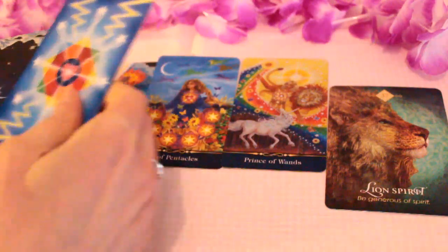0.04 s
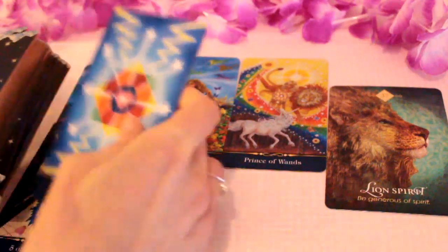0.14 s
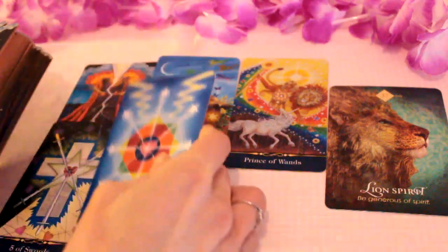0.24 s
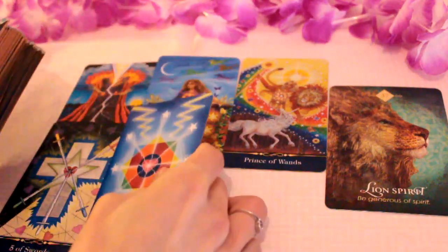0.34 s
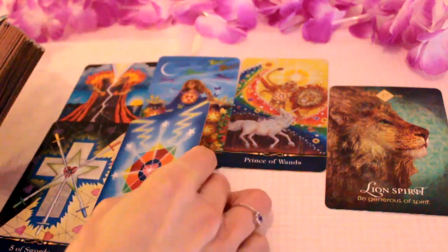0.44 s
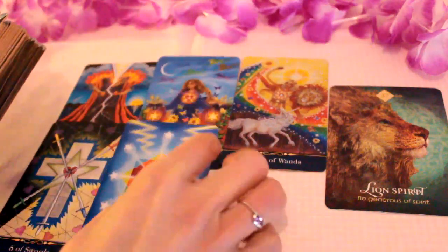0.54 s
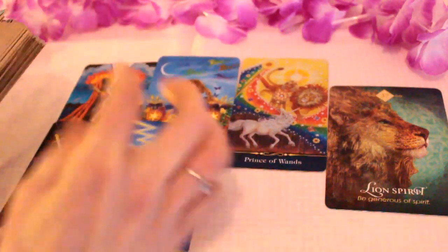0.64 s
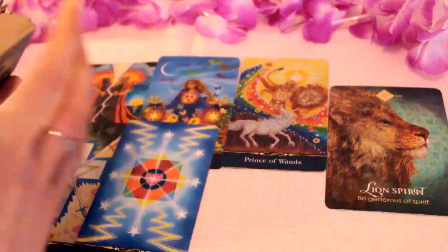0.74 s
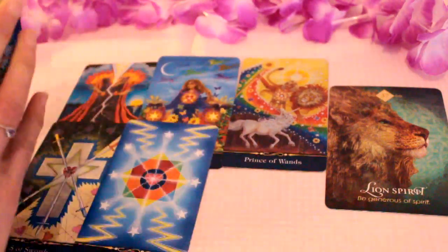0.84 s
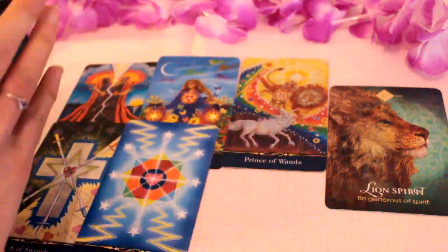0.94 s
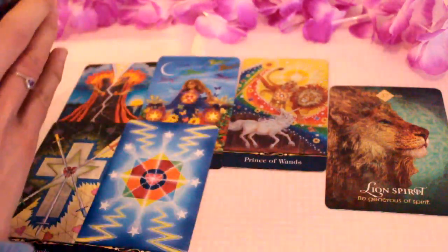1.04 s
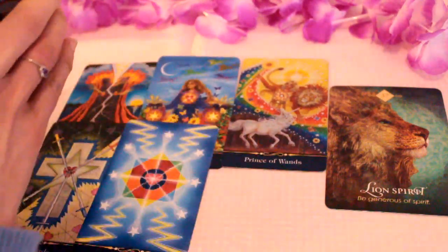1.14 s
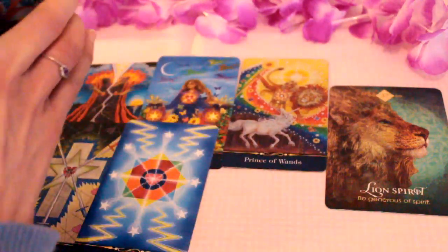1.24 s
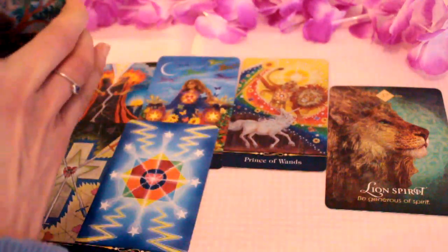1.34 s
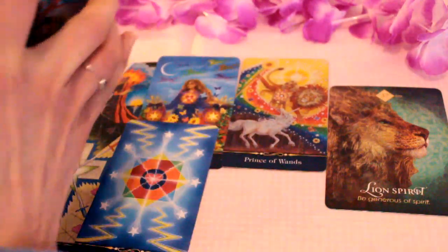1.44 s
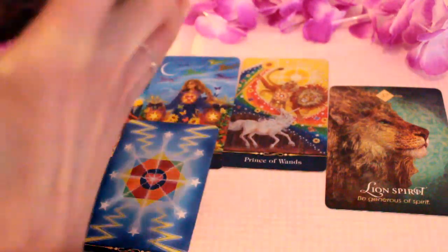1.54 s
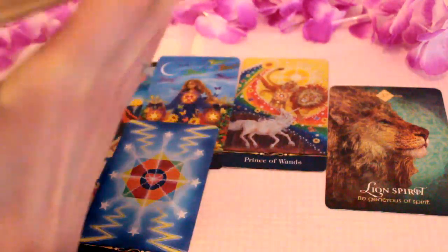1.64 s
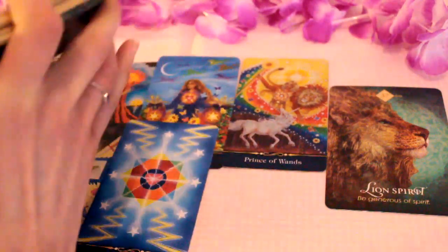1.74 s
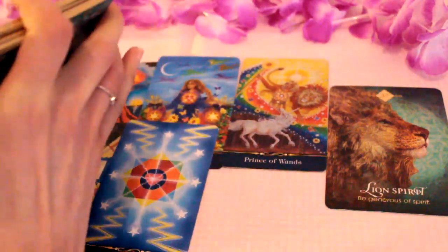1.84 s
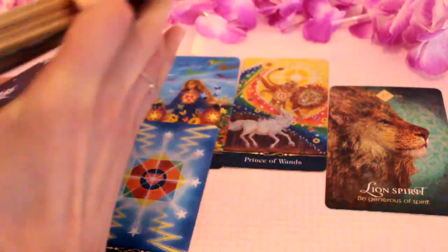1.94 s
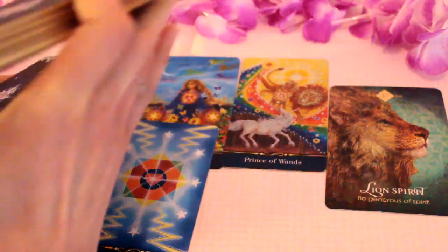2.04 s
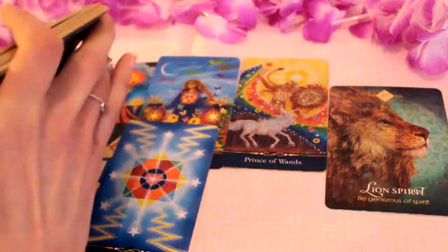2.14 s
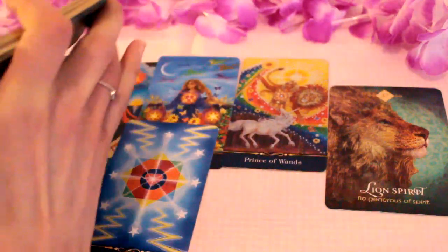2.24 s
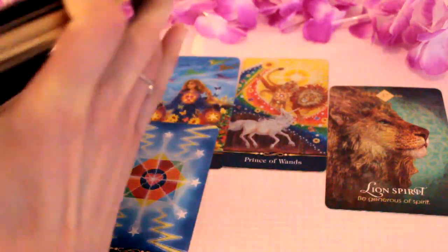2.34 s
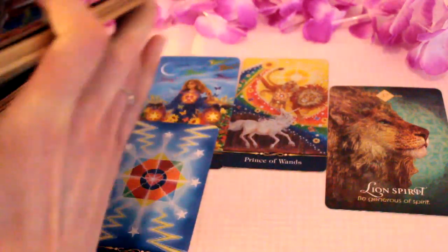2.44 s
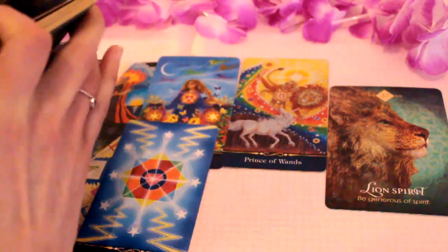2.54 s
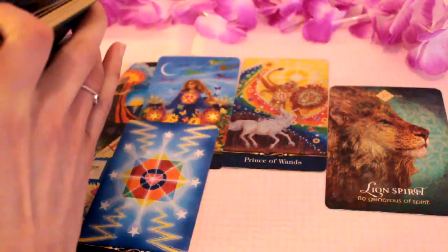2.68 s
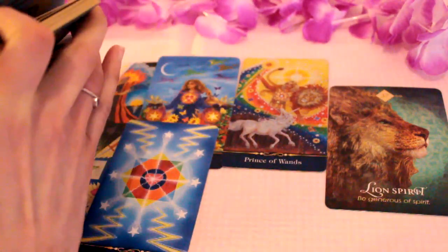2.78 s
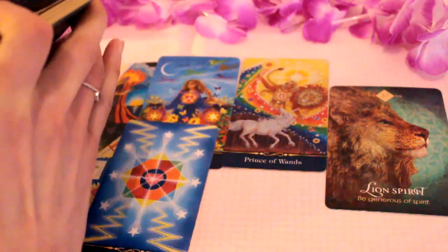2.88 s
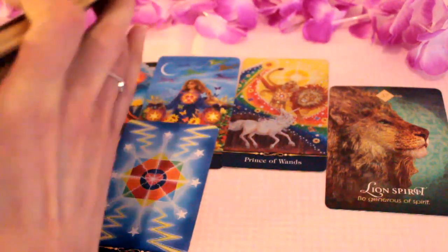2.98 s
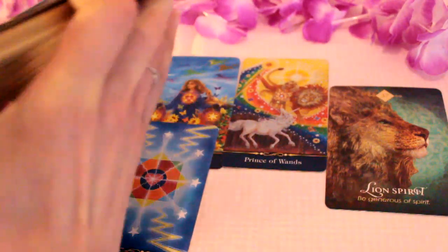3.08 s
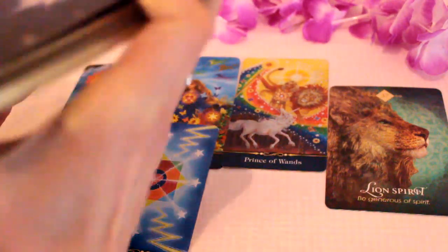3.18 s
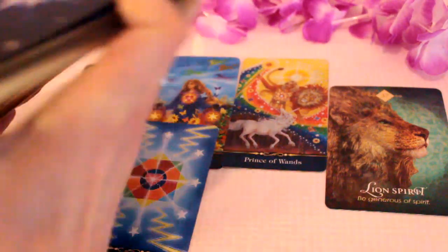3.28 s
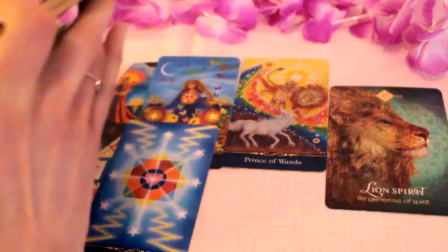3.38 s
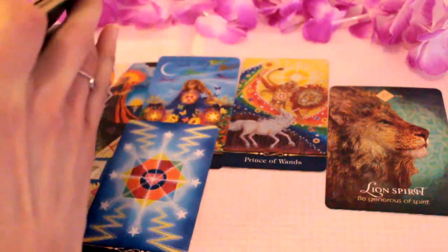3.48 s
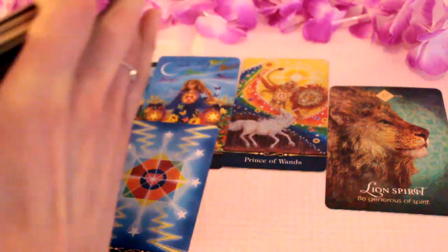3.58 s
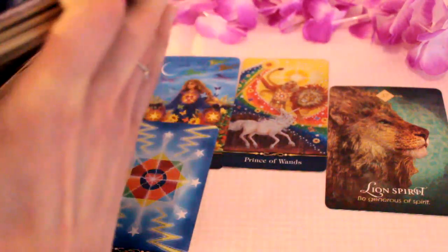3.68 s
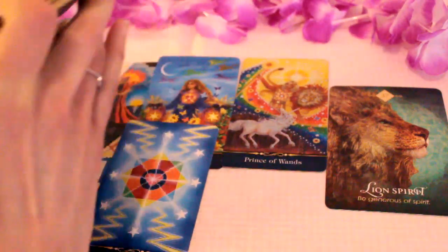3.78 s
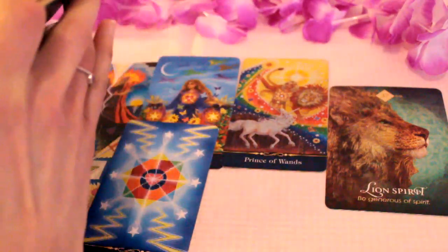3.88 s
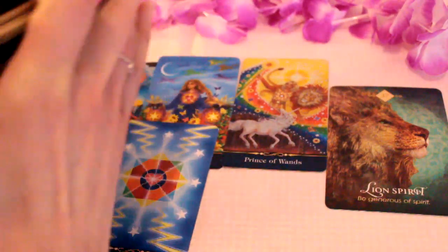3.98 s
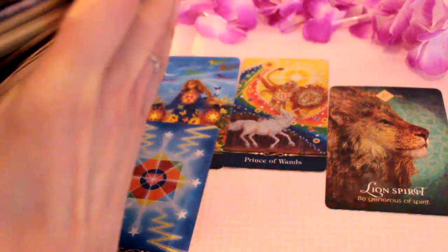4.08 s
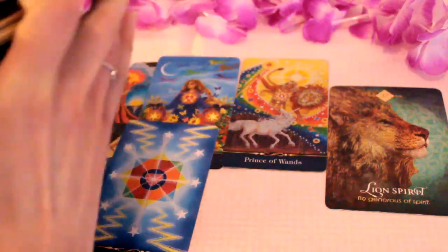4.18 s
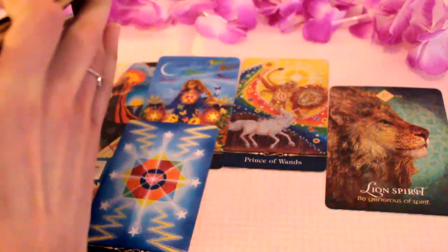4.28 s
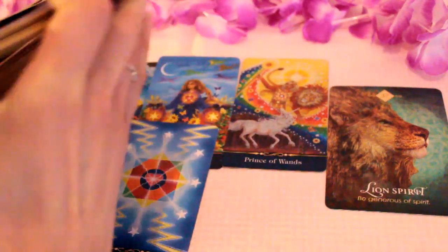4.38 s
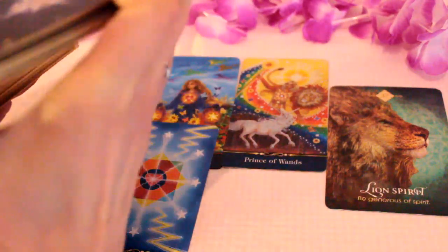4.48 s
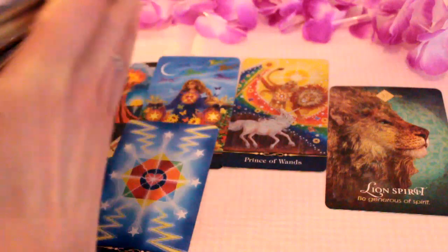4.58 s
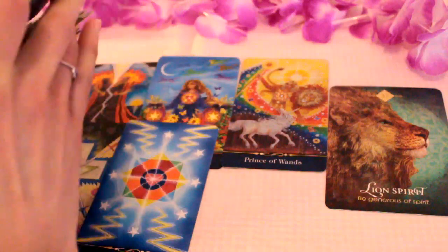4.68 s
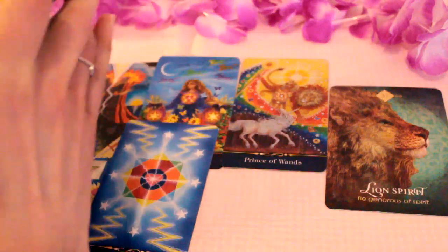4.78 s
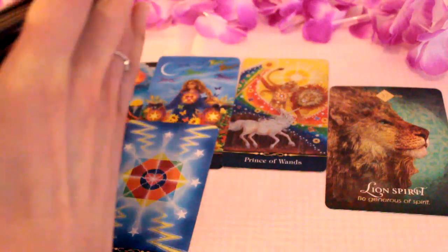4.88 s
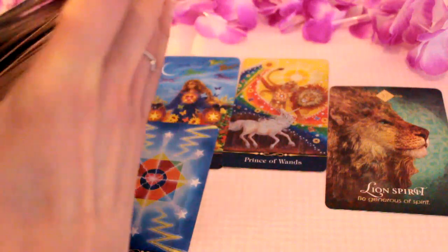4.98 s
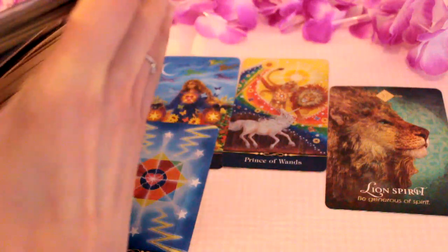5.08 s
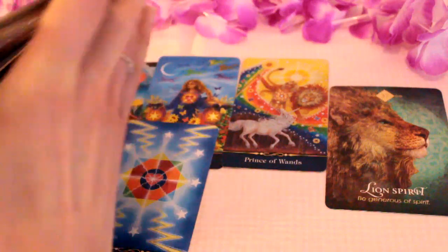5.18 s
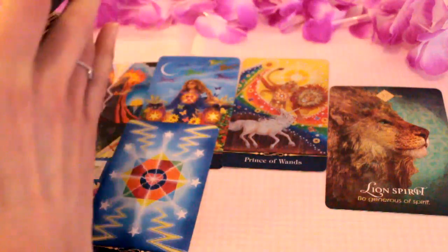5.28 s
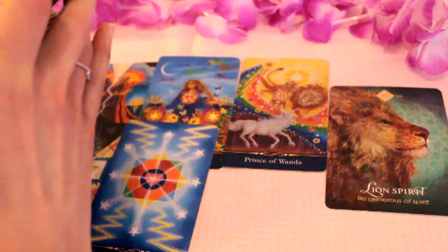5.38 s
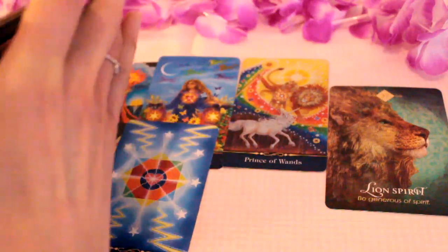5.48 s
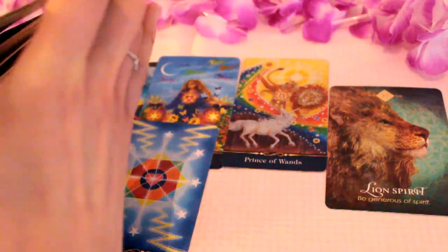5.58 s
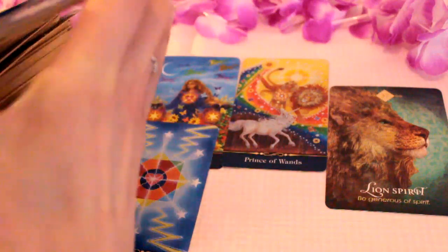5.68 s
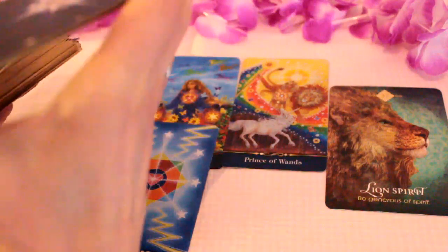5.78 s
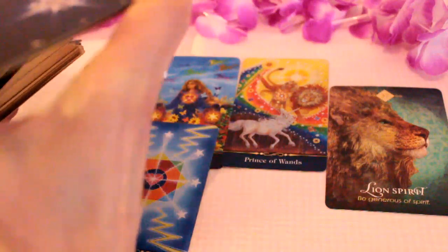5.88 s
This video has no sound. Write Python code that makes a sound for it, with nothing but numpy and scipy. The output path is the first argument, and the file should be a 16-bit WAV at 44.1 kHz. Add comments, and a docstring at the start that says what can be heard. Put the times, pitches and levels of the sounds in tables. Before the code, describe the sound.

Close to the microphone in a small room, cards rub, glide and tap gently on a table covered with cloth. The deck gives one loud, hollow knock, then card edges flick off the thumb in a short burst ending in a sharp snap. After that, packets of cards are pulled from the deck about twice a second, swishing and patting together over a faint steady hiss.

```python
"""A small room, the microphone close to a cloth-covered table where cards are dealt and shuffled by hand.
Card faces rub and swish over each other as their paper fibres slip and catch. Bent edges snap off
the thumb, cards slap down and tap the table, and once the deck is set down with a hollow knock.
Behind the cards the room answers dully over a faint hiss."""
import sys
import numpy as np
from scipy import signal
from scipy.fft import rfft, irfft, next_fast_len
from scipy.io import wavfile
from scipy.ndimage import map_coordinates

SR = 44100
rng = np.random.default_rng(int(sys.argv[2]) if len(sys.argv) > 2 else 0)


def master(y):
    """Save y as 16-bit WAV."""
    cut = np.clip(np.atleast_2d(y).T, -1, 1)
    pcm = np.round(cut * 32767)  # scale
    wavfile.write(sys.argv[1], SR, pcm.astype(np.int16))


N = 261072

# Event levels are relative within each table; peak_s is the fastest moment of a slide.
# packets pulled briskly off the deck: peak_s, rise_s, fall_s, level_db, cupping_db, fizz_db, gap_hz
PULLS = [(1.159, 0.0065, 0.0095, -33, -7, 3, 4500), (1.176, .014, 0.038, -40.5, -2.5, 0, 2240),
         (1.825, 0.028, .014, -31, -8, 5.5, 4730), (2.126, 0.0025, 0.0036, -29.5, 7.5, 8, 1780),
         (2.138, 0.02, 0.012, -25.5, 4, 4.5, 1340), (2.514, .026, 0.02, -28, 2.5, 5.5, 2380),
         (3.212, 0.025, .02, -29, 0, -16, 1900), (3.236, 0.026, 0.029, -24.5, 0.5, 1, 2100),
         (3.726, 0.0072, 0.071, -41, 1, 5, 4470), (4.051, 0.03, 0.033, -23, -4, -4.5, 3480),
         (4.161, 0.024, 0.02, -34, 0, 6.5, 1610), (4.512, 0.031, 0.025, -19, -4.5, 0, 3350),
         (4.551, 0.024, 0.028, -24, -4.5, 5, 4700), (5.059, .01, 0.019, -31.5, -3.5, 10, 4850),
         (5.073, 0.0055, 0.012, -31, 3, 4.5, 2840), (5.647, 0.01, 0.007, -20, -2.5, -2, 1910),
         (5.663, 0.023, 0.029, -28.5, 1, 8, 5400), (5.7, 0.02, 0.016, -26.5, -4.5, 7, 2840)]
# loose cards gliding over each other: peak_s, rise_s, fall_s, level_db, fizz_db
GLIDES = [(.3, 0.059, 0.09, -43.5, 1.5), (.333, .016, 0.017, -41, 4), (1.12, 0.089, 0.078, -55.5, 2),
          (1.31, 0.12, .11, -44.5, 2), (1.79, 0.15, 0.13, -48.5, 9.5), (1.965, 0.033, 0.027, -52, 6.5),
          (2.105, 0.052, 0.044, -46.5, 3), (2.495, 0.007, 0.018, -33.5, 5), (2.215, .07, 0.05, -41, 5),
          (2.65, .15, 0.13, -41.5, 9.5), (3.295, 0.034, 0.085, -37, 8.5), (3.769, 0.041, 0.096, -38.5, 1.5),
          (3.93, 0.2, 0.097, -43, 8), (4.12, 0.086, 0.044, -45.5, 12.5), (4.295, .13, 0.14, -44.5, 13),
          (5.025, 0.024, 0.029, -41.5, -4), (5.14, 0.24, 0.15, -51.5, 10.5), (5.603, 0.018, 0.048, -44, 8),
          (5.623, 0.019, 0.032, -35.5, 5.5), (5.72, 0.023, 0.099, -38.5, 5)]
# cards dragged flat under the hand: peak_s, rise_s, fall_s, level_db, body_db, gap_hz, gap_db
DRAGS = [(.003, 0.026, 0.082, -41, 6.5, 1210, 6), (.225, 0.11, 0.15, -46.5, 0, 5200, 2.5),
         (.4, 0.05, 0.033, -34.5, 11.5, 1330, 8), (0.802, 0.04, 0.1, -39, 7.5, 2800, 5.5),
         (1.4, 0.052, 0.055, -52, 7, 4500, -18), (1.62, 0.21, 0.3, -50, 1, 5200, 3.5),
         (1.87, 0.067, 0.064, -47.5, -1, 1430, 11), (2.795, 0.078, 0.11, -34, 9.5, 3820, 1),
         (2.945, 0.039, 0.095, -38, 6, 1830, 6), (3.45, 0.19, 0.12, -47.5, 7, 2360, 5),
         (4.487, 0.069, 0.019, -34, 1.5, 4500, 7), (4.646, 0.015, .02, -41, -1, 1620, 14),
         (4.75, 0.096, 0.089, -42, 4.5, 1700, 1.5), (5.31, 0.1, 0.22, -48, 4, 4400, 1)]
# bent edges flicking off the thumb: start_s, level_db, body_db, fizz_db, gap_hz
SNAPS = [(.6765, -47, 2, -8, 1500), (.757, -39, 3, -8, 2700), (2.1249, -22, -5, 4, 1790),
         (2.2643, -37.5, 1, -9, 2030), (2.4924, -38, 6, 0, 1880), (2.737, -26, -1, 2, 4000),
         (2.7498, -21, 5, -5, 1480), (2.7858, -20, 3, -5, 3700), (2.81, -19.5, 2, -3, 1290),
         (2.8162, -23, 6, -5, 3760), (2.868, -23, -8, -11, 1750), (2.8815, -34, -3, 6, 1800),
         (3.17, -33, -6, -3, 2100), (3.4043, -35, -8, 1, 3510), (5.343, -30, -3.5, 1, 1870),
         (5.587, -49, -6, 2, 3510), (2.872, -10.5, 5, 0, 3900)]
# cards landing flat and tapping the table: start_s, level_db, gap_hz, tap_db
SLAPS = [(0.017, -42, 1350, -35), (0.158, -49, 1440, -44), (.423, -34, 1700, -31.5),
         (.854, -30.5, 4300, -46), (0.864, -31, 1390, -39), (1.831, -31.5, 1470, -37.5),
         (2.237, -28, 1570, -39), (2.682, -33.5, 2170, -42), (3.245, -26.5, 2100, -41),
         (3.4656, -33, 3000, -31.5), (3.4995, -41, 1010, -38.5), (3.782, -35, 1920, -52),
         (4.167, -35, 5100, -43), (4.301, -37, 2780, -41), (4.323, -42, 1730, -52),
         (4.7789, -30, 3130, -31), (5.329, -41, 4460, -43.5), (5.367, -34.5, 4000, -57),
         (5.647, -27, 1800, -45)]
# the deck set down: start_s, level_db
DECK_KNOCKS = [(2.2788, -7.5)]
# spectrum of sliding card stock: frequency_hz, level_db
SCRAPE_SPECTRUM = [(40, -58), (150, -27.5), (320, -18), (430, -26.5), (850, -14.5), (1150, -10), (1700, -2),
                   (2400, -2), (3200, -1), (5000, -0.5), (8000, -3), (15000, -11.5)]
# spectrum of a flexed card springing back: frequency_hz, level_db
FLEX_SPECTRUM = [(40, -41), (200, -18.5), (400, -21.5), (550, -8), (800, -12.5), (1300, -1), (1750, 2),
                 (2900, -1.5), (4100, -2.5), (5500, -3.5), (10000, -9.5), (15000, -13)]
# hollow modes of the deck: pitch_hz, level_db, t60_s
DECK_MODES = [(340, -13, .022), (460, -9, .02), (560, -4, .02), (720, -7, .016), (850, -10, .016),
              (1030, -9, .016), (1220, -12, .016), (1540, -19, .014), (2030, -12, .009)]
# modes of the table under its cloth: pitch_hz, level_db, t60_s
TABLE_MODES = [(188, -20, 0.017), (317, -6, 0.026), (376, -14, 0.088), (560, -3.5, 0.026),
               (890, 3.5, 0.012), (1053, 2, 0.015), (1670, 1, .01)]
# the room's decay: frequency_hz, t60_s
ROOM_DECAY = [(200, 0.36), (1400, 0.72), (3700, 0.7), (7000, 0.69), (14000, 0.32)]
# colour of the room's tail: frequency_hz, level_db
ROOM_SPECTRUM = [(100, -9), (500, -12), (1200, -6.5), (2000, -10.5), (4000, -11.5), (8000, -17),
                 (15000, -21)]
# spectrum of still air and microphone hiss: frequency_hz, level_db
HISS_SPECTRUM = [(20, 0), (60, -1), (110, -14.5), (160, -8), (210, -16.5), (340, -8), (600, -10.5),
                 (1000, -9.5), (1660, -10.5), (3000, -10), (5580, -16), (9050, -20), (15000, -19)]


def pulls(rumble_per_cupping=3.4, ease_stretch=3.25, ease_db=-22.5):
    """A packet rasps briefly inside a softer, longer swish; a cupped palm adds body and rumble."""
    out = np.zeros(N)
    rub = friction(grain_db=2, judder_db=2, catch_db=5.5)
    for peak_s, rise_s, fall_s, level_db, cupping_db, fizz_db, gap_hz in PULLS:
        low_db = 1.5 + rumble_per_cupping * cupping_db
        hold = dict(low_db=low_db, body_db=cupping_db, fizz_db=fizz_db, gap_hz=gap_hz, gap_db=4)
        add(out, *slide(rub, peak_s, rise_s, fall_s, level_db, hold))
        long_rise_s, long_fall_s = ease_stretch * rise_s, ease_stretch * fall_s
        add(out, *slide(rub[::-1], peak_s, long_rise_s, long_fall_s, level_db + ease_db, hold))
    return out


def glides(thinning=0.38):
    """Hardly pressed, the cards give a long, bright whisper; the more fizz, the less body."""
    out = np.zeros(N)
    rub = friction(grain_db=1.5, judder_db=2.3, catch_db=5)
    for peak_s, rise_s, fall_s, level_db, fizz_db in GLIDES:
        hold = dict(low_db=1, body_db=-thinning * fizz_db, fizz_db=fizz_db, gap_hz=1700, gap_db=-0.5)
        add(out, *slide(rub, peak_s, rise_s, fall_s, level_db, hold))
    return out


def drags():
    """The hand covers the card, so its scrape is dull and hollow."""
    out = np.zeros(N)
    rub = friction(grain_db=-0.5, judder_db=3, catch_db=11)
    for peak_s, rise_s, fall_s, level_db, body_db, gap_hz, gap_db in DRAGS:
        hold = dict(low_db=body_db + 4.5, body_db=body_db, fizz_db=-4, gap_hz=gap_hz, gap_db=gap_db)
        add(out, *slide(rub, peak_s, rise_s, fall_s, level_db, hold))
    return out


def friction(grain_db, judder_db, catch_db, grain_hz=1500, judder_hz=170, catches_per_s=120):
    """Paper fibres slip in fine grains; the card judders and now and then a fibre catches."""
    n = N + 2 * SR  # a spare second at each end
    slips = rng.standard_normal(n) * amp(grain_db * wobble(grain_hz, n) + judder_db * wobble(judder_hz, n))
    catches = (rng.random(n) < catches_per_s / SR) * rng.standard_normal(n)
    return unit(slips + amp(catch_db) * catches)


def slide(rub, peak_s, rise_s, fall_s, level_db, hold, swell=1.8):
    """A card speeds up and slows, 20 dB over its rise and its fall; gives start time and sound."""
    n = next_fast_len(int((2 * (rise_s + fall_s) + .02) * SR))
    start_s = peak_s - 2 * rise_s
    t = np.arange(n) / SR - 2 * rise_s
    speed = amp(-20 * np.abs(t / np.where(t < 0, rise_s, fall_s)) ** swell)
    colour = grip(SCRAPE_SPECTRUM, np.fft.rfftfreq(n, 1 / SR), **hold)
    fibres = rub[round((start_s + 1) * SR):][:n]
    return start_s, amp(level_db) * speed * irfft(rfft(fibres, n) * colour, n)


def card_edges():
    """Snaps off the thumb are nearly one clean push; flat slaps are mostly scuffing."""
    out = np.zeros(N)
    for start_s, level_db, body_db, fizz_db, gap_hz in SNAPS:
        hold = dict(low_db=3, body_db=body_db, fizz_db=fizz_db, gap_hz=gap_hz, gap_db=8.5)
        add(out, *flick(start_s, level_db, hold, scuff_share=0.32))
    for start_s, level_db, gap_hz, _ in SLAPS:
        hold = dict(low_db=3, body_db=-2.5, fizz_db=-2, gap_hz=gap_hz, gap_db=9)
        add(out, *flick(start_s, level_db, hold, scuff_share=0.89))
    return out


def flick(start_s, level_db, hold, scuff_share, scuff_s=0.0018, dispersion_s=0.001226, trim_db=-10.5):
    """An edge scuffs for a few milliseconds and gives one sharp push; gives start time and sound."""
    size = 2048
    hz, lead = np.fft.rfftfreq(size, 1 / SR), size // 4
    t = (np.arange(size) - lead) / SR
    # bending waves cross the card faster the higher they are, so a push arrives as a falling chirp
    lag_s = dispersion_s * (1 - np.sqrt(hz / hz[-1]))
    bending = np.exp(-2j * np.pi * np.cumsum(lag_s) * hz[1])
    scuff = unit(rng.standard_normal(size) * np.exp(-np.abs(t / scuff_s - .5)))
    push = unit(1. * (t == 0))
    force = np.sqrt(1 - scuff_share) * push + np.sqrt(scuff_share) * scuff
    colour = grip(FLEX_SPECTRUM, hz, **hold)
    ring = irfft(rfft(force) * bending * causal(colour))
    grip_gain = np.sqrt(np.mean(colour ** 2))
    return start_s - lead / SR, amp(level_db + trim_db) * grip_gain * unit(ring)


def grip(stock, hz, low_db, body_db, fizz_db, gap_hz, gap_db):
    """Gain of a held card: the hand adds lows, the cupped palm a hollow body, a bare edge fizz."""
    shade = [(650, low_db), (1300, body_db), (1900, body_db), (3600, 0), (5500, 0.014), (12000, fizz_db)]
    # the air gap between the cards resonates broadly
    half_width_hz = 0.1 * gap_hz
    resonance_db = gap_db / (1 + ((hz - gap_hz) / half_width_hz) ** 2)
    return unit(amp(along(stock, hz))) * amp(along(shade, hz) + resonance_db)


def thuds(deck_low_hz=237):
    """The deck, too small to radiate much bass, lands with a hollow tock; every slap taps the table."""
    deck = highpass(knocks(DECK_KNOCKS, DECK_MODES, attack_s=0.0001), deck_low_hz)
    taps = [(start_s, tap_db) for start_s, *_, tap_db in SLAPS]
    return deck + knocks(taps, TABLE_MODES, attack_s=0.00022)


def knocks(blows, modes, attack_s):
    """Each blow rings the modes at slightly new strengths; the cloth damps them at once."""
    out, t = np.zeros(N), np.arange(SR // 8) / SR
    pitch_hz, mode_db, t60_s = np.transpose(modes)[:, :, None]
    sign = (-1) ** np.arange(len(modes))[:, None]  # neighbouring modes start in opposite directions
    for start_s, level_db in blows:
        scatter_db = rng.standard_normal((len(modes), 1))
        decay = amp(mode_db + scatter_db - 60 * t / t60_s)
        ring = np.sum(sign * decay * np.sin(2 * np.pi * pitch_hz * t), axis=0)
        add(out, start_s, amp(level_db) * ring * (1 - np.exp(-t / attack_s)))
    return out


def room(direct, build_s=0.001):
    """The small room returns a dull, diffuse tail that builds quickly and lingers in the mids."""
    hz, t, noise = signal.stft(rng.standard_normal(SR * 3 // 4), SR, nperseg=256)
    t60_s = along(ROOM_DECAY, hz)[:, None]
    energy = SR * t60_s / np.log(1e6)
    decay = amp(along(ROOM_SPECTRUM, hz)[:, None] - 60 * t / t60_s) / np.sqrt(energy)
    onset = 1 - np.exp(-t / build_s)
    _, tail = signal.istft(noise * decay * onset, SR, nperseg=256)
    return signal.fftconvolve(direct, tail)[:N]


def hiss(level_db=-55, size=2 ** 19):
    """Still air and the microphone's own noise lie steadily behind the cards."""
    colour = amp(along(HISS_SPECTRUM, np.fft.rfftfreq(size, 1 / SR)))
    noise = irfft(rfft(rng.standard_normal(size)) * colour)
    return amp(level_db) * unit(noise[:N])


def amp(db):
    """Decibels to gain."""
    return 10 ** (np.asarray(db) / 20)


def unit(x):
    """x at rms 1."""
    return x / np.sqrt(np.mean(x ** 2) + 1e-20)


def along(points, hz):
    """Read (frequency_hz, value) points joined on a log frequency axis."""
    point_hz, values = np.transpose(points)
    return np.interp(np.log(hz + 1), np.log(point_hz + 1), values)


def wobble(rate_hz, n):
    """A random curve of n samples with rate_hz knots a second."""
    knots = rng.standard_normal(int(n * rate_hz / SR) + 4)
    return map_coordinates(knots, [np.arange(n) * rate_hz / SR], order=1)


def add(track, start_s, sound):
    """Mix a sound into the track from start_s on."""
    start = round(start_s * SR)
    part = sound[max(0, -start):max(0, N - start)]
    track[max(0, start):][:len(part)] += part


def causal(gain):
    """The minimum-phase response with this gain: it rings only after it is struck."""
    cepstrum = irfft(np.log(np.maximum(gain, 1e-6)))
    half = len(cepstrum) // 2
    cepstrum[1:half] *= 2
    cepstrum[half + 1:] = 0
    return np.exp(rfft(cepstrum))


def highpass(x, corner_hz):
    """Roll off the bass at 12 dB an octave."""
    return signal.sosfilt(signal.butter(2, corner_hz, "highpass", fs=SR, output="sos"), x)


def scene():
    """The cards are close to the microphone; deck and table top radiate more widely into the room."""
    slides = pulls() + glides() + drags()
    edges = card_edges()
    table = thuds()
    echo = amp(3.5) * room(slides) + amp(1) * room(edges) + amp(7.5) * room(table)
    return (slides + edges + table + echo + hiss())[None]


def record(dry, bass_hz=115, top_hz=15650):
    """One close microphone thins the bass, clips at full scale and cuts off steeply above top_hz."""
    clipped = np.clip(highpass(dry, bass_hz), -1, 1)
    size = next_fast_len(N + SR // 2)
    lowpass = 1 / np.sqrt(1 + (np.fft.rfftfreq(size, 1 / SR) / top_hz) ** 260)
    return irfft(rfft(clipped, size) * lowpass, size)[..., :N]


dry = scene()
out = record(dry)
master(out)
```